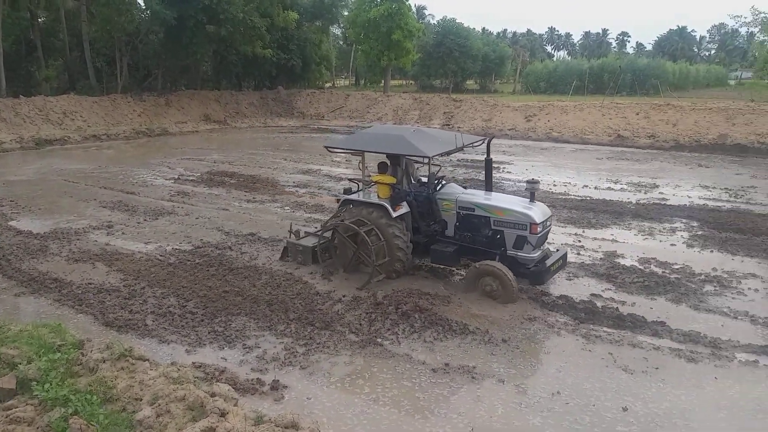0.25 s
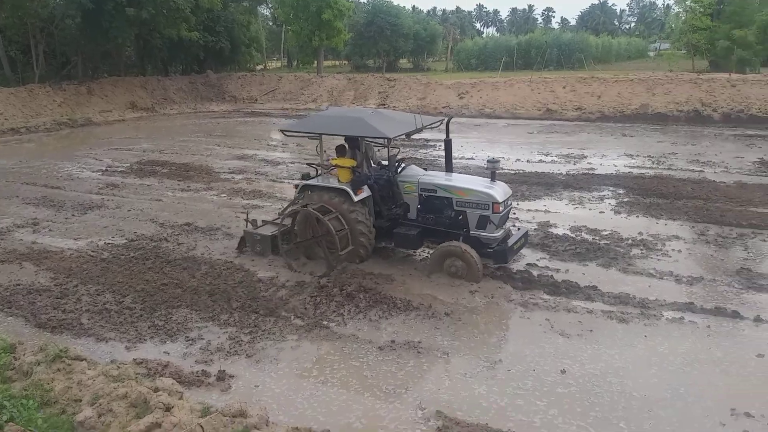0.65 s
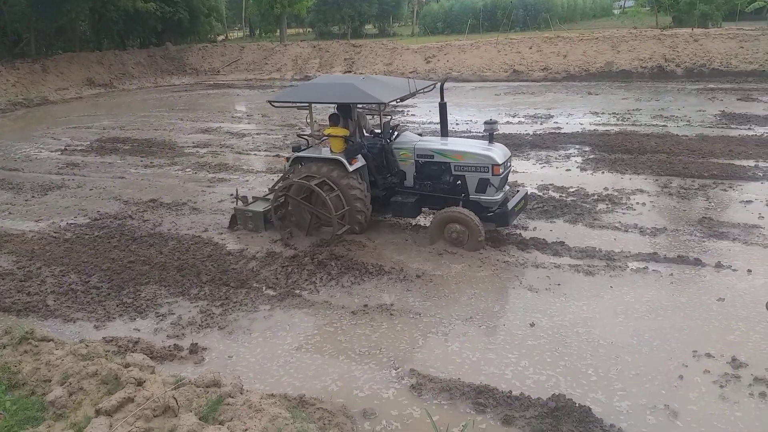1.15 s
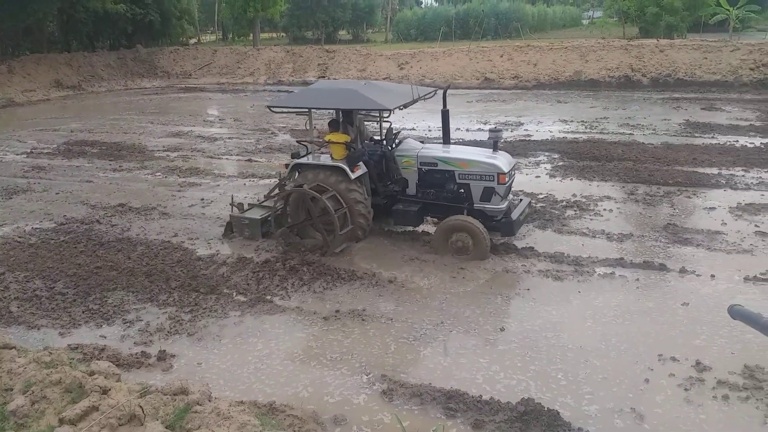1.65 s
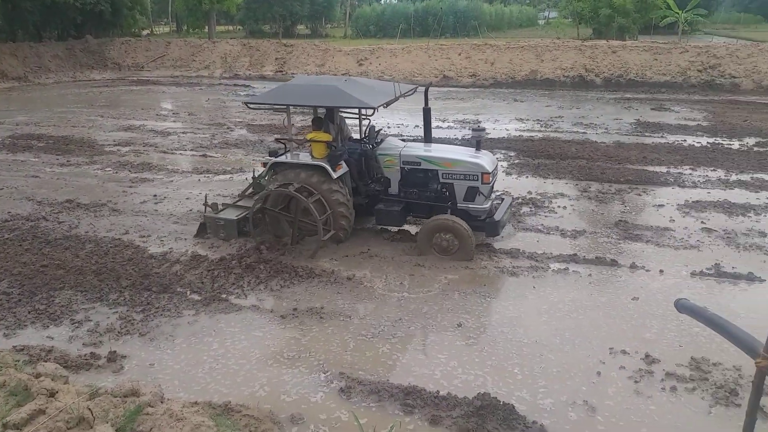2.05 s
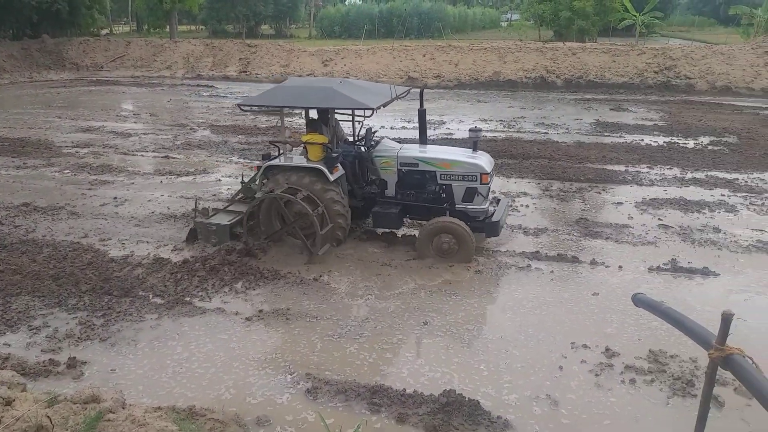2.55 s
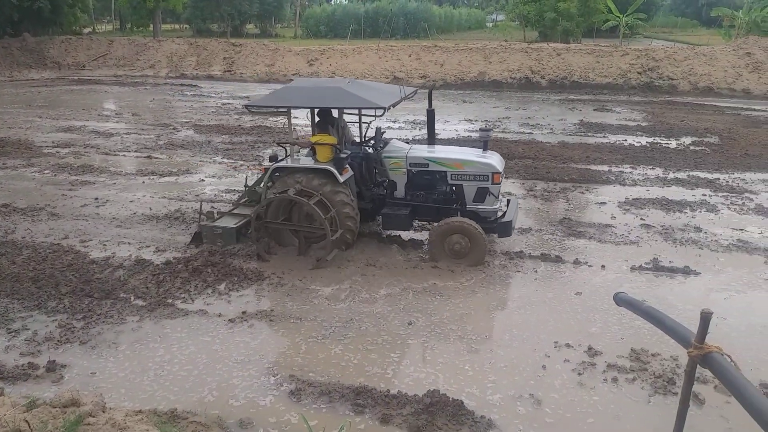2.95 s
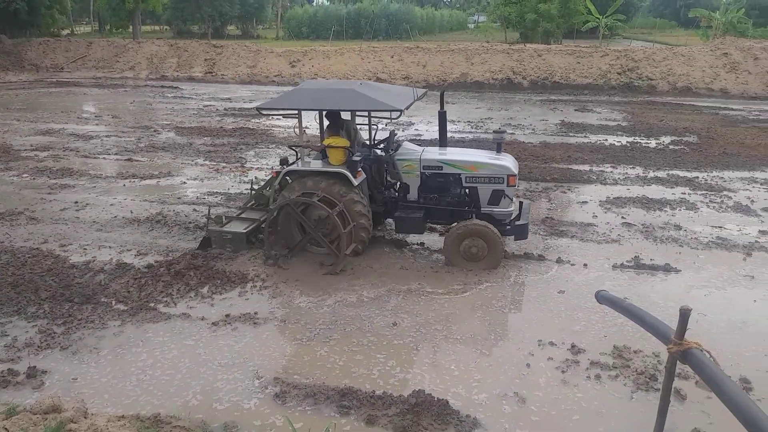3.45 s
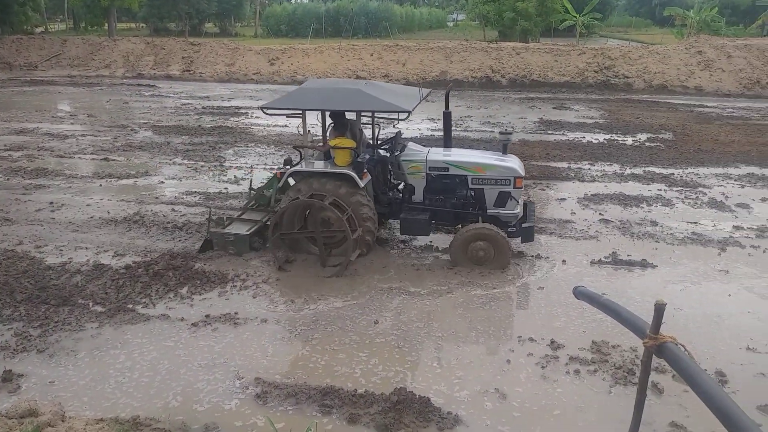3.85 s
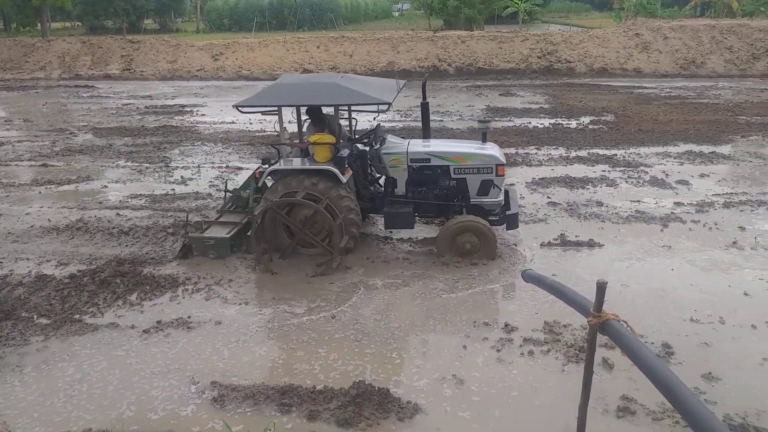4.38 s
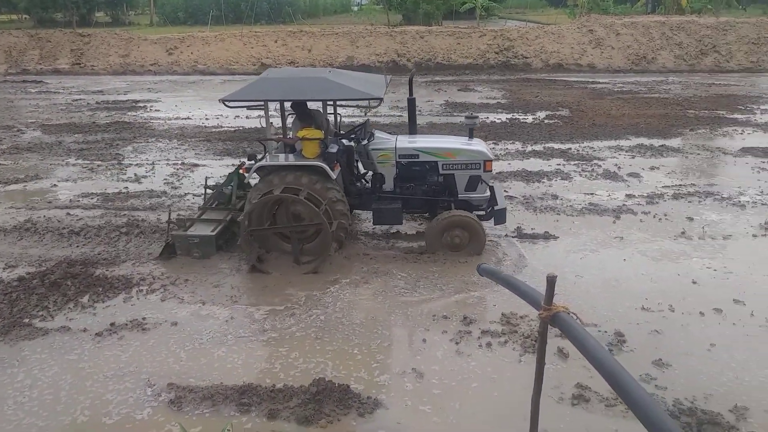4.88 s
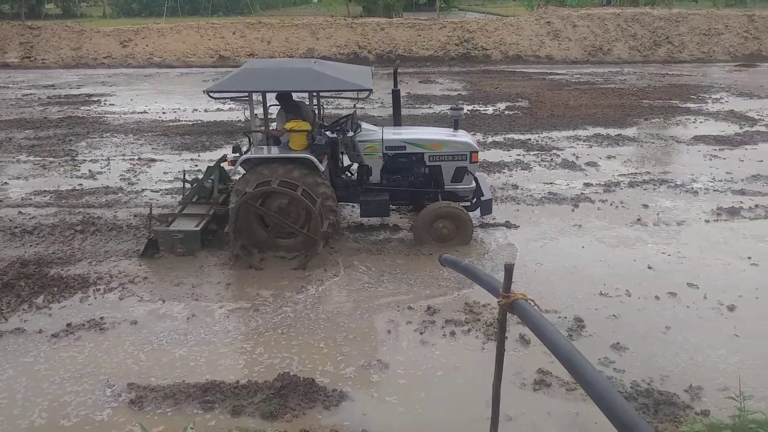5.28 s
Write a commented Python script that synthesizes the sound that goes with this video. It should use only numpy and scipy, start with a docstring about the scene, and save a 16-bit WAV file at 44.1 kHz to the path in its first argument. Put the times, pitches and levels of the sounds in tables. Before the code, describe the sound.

A diesel tractor runs steadily some metres away in an open, flooded field, with a rapid exhaust chug, hard metallic knocking and rattling panels. The engine labours slightly three times as its tiller meets heavier mud. Gears whine faintly, and a fine hiss of sprayed muddy water slowly fades. A bird chirps twice, briefly, right at the start.

```python
"""A flooded field: some metres away, a three-cylinder diesel tractor drags a tiller past.
Each firing sends a thud and a rasp up the exhaust stack, knocks the block and shakes the metalwork.
Heavier mud loads the engine three times; early on, the tractor turns from front-on to side-on.
Gears whine faintly, the tiller sprays muddy water, and a bird chirps twice."""
import sys
import numpy as np
from scipy import signal
from scipy.fft import rfft, irfft
from scipy.io import wavfile

SR = 44100
rng = np.random.default_rng(int(sys.argv[2]) if len(sys.argv) > 2 else 0)


def generate_wav(sig):
    """Save sig (samples, or channels by samples) to the path in sys.argv[1] as 16-bit PCM at SR."""
    pcm = np.round(np.clip(np.atleast_2d(sig).T, -1, 1) * 32767).astype(np.int16)
    wavfile.write(sys.argv[1], SR, pcm)


N = 243458
TIME = np.arange(N) / SR
FROM_MID_S = TIME - TIME.mean()


# governor hunting: (time [s], firing rate [Hz])
FIRING_RATE = [(0, 40.53), (.49, 40.14), (.75, 40.38), (.99, 39.42), (1.21, 39.12), (1.71, 39.99),
               (2.25, 39.3), (2.56, 39.42), (3.06, 38.59), (3.46, 38.88), (3.76, 39.92), (3.99, 39.79),
               (4.27, 39.05), (4.68, 39.06), (5.06, 39.6), (5.52, 39.64)]

def firing_count():
    """Engine phase: each whole number is one firing."""
    return np.cumsum(curves(FIRING_RATE)[0]) / SR + .18


# firing order, one row per cylinder: (knock [dB], exhaust pulse [dB])
CYLINDERS = [(3, 6.5), (4, 9.5), (-0.5, 8)]
KNOCK_DB, PULSE_DB = np.transpose(CYLINDERS)
# (multiple of firing rate, mid level [dB], slope with thud level [dB/dB], trend [dB/s])
EXHAUST_PARTIALS = [(1, -58.5, 1, -0.5), (2, -40.5, 0.3, .5), (3, -57.5, -2, -2), (4, -44.5, 0.5, 1.5),
                    (5, -45.5, 4, 1), (6, -56, 6, -1.5), (7, -47, 2.5, -0.5), (8, -48.5, -1, 0),
                    (10, -51.5, 0, -1)]
# stack spectra: (frequency [Hz], relative level [dB])
THUD_SPECTRUM = [(56, -56), (95, -11), (108, -6), (194, -2), (394, -4), (443, -9), (480, -6), (620, -27),
                 (1060, -120)]
RASP_SPECTRUM = [(2500, -42), (3500, 2), (4250, -18), (5350, 0.5), (6200, -5.5), (6850, -1.5), (7450, 6),
                 (8300, 10), (9100, 2), (10300, -5.5), (12000, -11.5), (14000, -4.5), (16000, -16)]
# (mid level [dB], load slope [dB/dB], trend [dB/s], front-on offset [dB])
THUD_LAW = (-35.9, 0.32, -0.11, -1.5)
RASP_LAW = (-32, 1.5, 0.14, -0.5)

def exhaust(firings, smear_cycles=0.0358, waver_db=0.4):
    """The stack: a low note, a thud of gas at each firing, and a rasp that grows with load."""
    thud_db = follow(THUD_LAW)
    push_db = thud_db - thud_db.mean()
    note = 0
    for k, db, per_thud, trend in EXHAUST_PARTIALS:
        # the silencer delays the higher partials, rounding each pulse
        cycles = k * (firings - 1 / 4) - smear_cycles * (k - 2) ** 2
        level_db = db + per_thud * push_db + trend * FROM_MID_S
        note += gain_of(level_db) * np.sqrt(2) * np.cos(2 * np.pi * cycles)
    puff = bursts(firings, PULSE_DB, delay_s=0.0017, rise_s=0.0013, decay_s=0.0024, uneven_db=5)
    thud = gain_of(thud_db) * colour(rng.standard_normal(N) * (puff + 5.3), THUD_SPECTRUM)
    jet = bursts(firings, PULSE_DB, delay_s=.0005, rise_s=.007, decay_s=.0075, uneven_db=.6)
    rasp_db = follow(RASP_LAW) + waver_db * drift(12)
    rasp = gain_of(rasp_db) * colour(rng.standard_normal(N) * jet, RASP_SPECTRUM)
    return note + thud + rasp


# block and cover modes: (frequency [Hz], width [Hz], relative level [dB])
BLOCK_MODES = [(1770, 36, -20), (1848, 43, -3.5), (1918, 9, 1), (1973, 7.6, -2), (2027, 97, 1.5),
               (2127, 14, -1.5), (2141, 27, -1), (2310, 18, -6.5), (2257, 22, -7.5), (2317, 83, -32)]
# combustion blow: (frequency [Hz], relative level [dB])
BLOW_SPECTRUM = [(1100, -18), (1500, -19), (1750, -3.5), (2400, -7), (2750, -9), (3100, -13.5), (4200, -19)]
# (mid level [dB], load slope [dB/dB], trend [dB/s], front-on offset [dB])
BLOCK_LAW = (-18, 0.36, -0.39, 0)
# ring pitch: (mid pitch [Hz], load slope [Hz/dB], trend [Hz/s], front-on offset [Hz])
RING_LAW = (2024, 13, 21, 75)

def block(firings, reach_hz=160):
    """Combustion and piston slap ring the block; load favours its higher modes."""
    blow = bursts(firings, KNOCK_DB, delay_s=0, rise_s=.002, decay_s=.011, uneven_db=.6)
    drive = colour(grains(per_s=12000, spread_db=.3) * (blow + .85), BLOW_SPECTRUM)
    ring_hz = follow(RING_LAW)
    centre_hz = ring_hz.mean()
    tilt_per_hz = (ring_hz - centre_hz) / reach_hz ** 2
    ring = sum(gain_of(db) * np.exp(tilt_per_hz * (hz - centre_hz)) * resonate(drive, hz, width_hz)
               for hz, width_hz, db in BLOCK_MODES)
    return gain_of(follow(BLOCK_LAW)) * evened(ring)


# hardest diesel knocks: (time [s], level [dB], ring [Hz])
HARD_KNOCKS = [(.9221, -4.2, 1970), (1.1511, -2.5, 2050), (1.3792, -2.2, 1950), (1.733, -1.5, 2080),
               (1.7615, -3, 2070), (1.8085, -1.5, 2080), (1.884, -1, 2060), (1.9107, -3.5, 2050),
               (1.9568, -4.5, 2040), (2.362, -2.8, 2090), (2.9787, -2.8, 2170), (3.2321, -3, 2080),
               (3.2839, -2, 2060), (3.3632, -2.3, 2100), (3.4405, -4, 2170), (3.643, -5, 2230),
               (4.3543, -5, 2110), (4.4307, -3.2, 2120), (4.5804, -3.8, 2210), (4.8883, -4.3, 2010),
               (5.0903, -5, 2120), (5.1916, -3.8, 1930), (5.2421, -4, 2090)]

def knocks(rows, rise_s=0.001, decay_s=0.0049, slap_delay_s=.012, slap_db=-10.5):
    """Each knock rings the block; the piston slaps once more just after."""
    age_s = TIME[:SR // 20]
    envelope = strike(age_s, rise_s, decay_s)
    out = np.zeros(N + SR)
    for knock_s, db, hz in rows:
        knock_phase, slap_phase, late = rng.random(3)
        slap_s = knock_s + slap_delay_s * (late + .5)
        for start_s, hit_db, phase in ((knock_s, db, knock_phase), (slap_s, db + slap_db, slap_phase)):
            at = round(start_s * SR)
            ring = np.sin(2 * np.pi * (hz * age_s + phase))
            out[at:at + len(age_s)] += gain_of(hit_db) * envelope * ring
    return out[:N]


# (mid level [dB], load slope [dB/dB], trend [dB/s], front-on offset [dB])
LIGHT_KNOCK_LAW = (-18.5, 1.2, 1.3, -2)

def light_knocks(firings, lag_s=.004, jitter_s=.005, uneven_db=3.5, scatter_hz=55):
    """Firings without a hard knock still knock a little, by cylinder, load and chance."""
    at = np.flatnonzero(np.diff(np.floor(firings))) + 1
    number = firings[at].astype(int)
    late, harsh, detune = rng.random((len(at), 3)).T
    start_s = TIME[at] + lag_s + jitter_s * late
    cylinder_db = np.take(KNOCK_DB, number, mode="wrap")
    level_db = follow(LIGHT_KNOCK_LAW)[at] + cylinder_db + uneven_db * evened(harsh - .5)
    ring_hz = follow(RING_LAW)[at] + scatter_hz * (2 * detune - 1)
    rows = np.transpose([start_s, level_db, ring_hz])
    hard = np.interp(np.transpose(HARD_KNOCKS)[0], TIME, firings).astype(int)
    return knocks(rows[~np.isin(number, hard)])


# rattle spectra: (frequency [Hz], relative level [dB])
CHASSIS_SPECTRUM = [(260, -48.5), (440, -14.5), (538, -1.5), (612, -2), (766, 3.5), (864, -2), (1150, -1.5),
                    (1500, -39), (2530, -120)]
PANEL_SPECTRUM = [(900, -17.5), (1130, -28), (1210, 2), (1300, 3.5), (1370, 3), (1440, 4), (1500, 2.5),
                  (1570, -2), (1640, 1), (1720, 1.5), (2240, -4.5), (3800, -73.5)]
VALVE_SPECTRUM = [(1500, -14), (2550, -6), (2980, -11), (3370, -4), (3630, -2.5), (3860, -7), (4300, -22.5),
                  (5590, -20.5), (9460, -120)]
# (mid level [dB], load slope [dB/dB], trend [dB/s], front-on offset [dB])
CHASSIS_LAW = (-28, 0.47, -0.05, 1)
PANEL_LAW = (-23, 0.3, -0.37, 3)
VALVE_LAW = (-26, 0.37, -0.23, 1)
# thin steel parts: (frequency [Hz], width [Hz], side-on level [dB])
STEEL_MODES = [(1449, 30, -47), (1582, 26, -31.5), (2817, 13, -47.5), (3157, 43, -45), (3436, 24, -41),
               (5345, 46, -46)]

def clatter(firings, steel_front_db=2):
    """Chassis, panels and valve gear chatter and thin steel sings, harder after each firing."""
    shake = bursts(firings, [0], delay_s=0.0015, rise_s=0.0076, decay_s=0.0072, uneven_db=3.5)

    def rattle(spectrum, per_s, spread_db, floor):
        return colour(grains(per_s, spread_db) * (shake + floor), spectrum)

    chassis = gain_of(follow(CHASSIS_LAW)) * rattle(CHASSIS_SPECTRUM, per_s=7000, spread_db=2, floor=3.3)
    panels = gain_of(follow(PANEL_LAW)) * rattle(PANEL_SPECTRUM, per_s=8000, spread_db=2.5, floor=2)
    valves = gain_of(follow(VALVE_LAW)) * rattle(VALVE_SPECTRUM, per_s=9000, spread_db=0.6, floor=5)
    taps = rattle([(1200, 0), (8000, 0)], per_s=4000, spread_db=4, floor=1)
    steel = sum(gain_of(db) * evened(resonate(taps, hz, width_hz)) for hz, width_hz, db in STEEL_MODES)
    return chassis + panels + valves + steel * gain_of(steel_front_db * front_view())


# gear meshes: (teeth per crank turn before rounding, mid level [dB], trend [dB/s])
GEAR_MESHES = [(20.5, -50, -2.8), (21, -45.5, -1.3), (25, -44, .6), (30, -40, 0.1), (39.7, -42, -1)]

def gears(firings, waver_db=3, slack_cycles=0.071):
    """Meshing teeth whine, wavering in level and phase."""
    crank_turns = firings * 2 / 3  # four-stroke: three firings in two turns
    whine = 0
    for teeth, db, trend in GEAR_MESHES:
        order = round(2 * teeth) / 2
        waver = gain_of(waver_db * drift(3))
        tone = np.sin(2 * np.pi * (order * crank_turns + slack_cycles * drift(6)))
        whine += gain_of(db + trend * FROM_MID_S) * evened(waver * tone)
    return whine


# water spray: (frequency [Hz], relative level [dB])
SPRAY_SPECTRUM = [(3600, -17.5), (4250, -14), (4750, -4.5), (5400, -2.5), (5950, -8.5), (6750, -8),
                  (7400, 1), (8250, 2), (9100, -5), (10300, -12.5), (12000, -17), (14000, -15),
                  (16000, -10.5)]

def tiller():
    """Blades fling a fine spray of muddy water; the hiss slowly fades."""
    level_db = -28 + 0.13 * drift(3.1) - 0.47 * TIME
    return gain_of(level_db) * colour(grains(per_s=20000, spread_db=2), SPRAY_SPECTRUM)


# bird: (time [s], length [s], start pitch [Hz], end pitch [Hz], level [dB])
BIRD_CHIRPS = [(.109, .028, 3950, 3150, -22.5), (.478, .069, 4500, 2950, -26.5)]

def chirp(start_s, length_s, start_hz, end_hz, db, flutter_db=1.5):
    """A thin whistle that falls ever faster, peaks late and flutters on its way across the field."""
    progress = np.clip((TIME - start_s) / length_s, 0, 1)
    hz = start_hz + (end_hz - start_hz) * progress ** 2
    swell = np.sqrt(2) * np.sin(np.pi * progress ** 2) * gain_of(db + flutter_db * drift(120))
    return swell * np.sin(2 * np.pi * np.cumsum(hz) / SR)


# open air: (frequency [Hz], relative level [dB])
AIR_SPECTRUM = [(15, -22), (30, -14), (55, -4), (90, 0), (200, 0), (600, -22)]

def field_air():
    """Low rush of the open field."""
    return gain_of(-60) * colour(rng.standard_normal(N), AIR_SPECTRUM)


# the tiller bites into heavier mud: (time [s], engine load re usual [dB])
ENGINE_LOAD = [(0, -4), (.8, -1.0), (1.0, -1), (1.25, 2.5), (1.65, 0.4), (2.0, -2), (2.7, 1.7), (2.95, 3.5),
               (3.58, 2), (3.85, -4), (4.08, -1.5), (4.35, 1.5), (4.8, 1.4), (5.1, -1.5), (5.52, -2.5)]

def follow(law):
    """A level or pitch that tracks the load and shifts as the tractor passes and turns."""
    mid, per_load, per_s, front_offset = law
    load_db = curves(ENGINE_LOAD)[0]
    return mid + per_load * load_db + per_s * FROM_MID_S + front_offset * front_view()


def front_view(turn_s=.8, ease_s=0.14):
    """1 with the tractor front-on, 0 side-on."""
    return (1 - np.tanh((TIME - turn_s) / (2 * ease_s))) / 2


def strike(age_s, rise_s, decay_s):
    """Impact envelope: smooth rise, exponential decay."""
    return (1 - np.exp(-(age_s / rise_s) ** 2)) * np.exp(-age_s / decay_s)


def bursts(firings, cylinder_db, delay_s, rise_s, decay_s, uneven_db):
    """Envelope with one uneven pulse per firing; rms 1."""
    at = np.flatnonzero(np.diff(np.floor(firings)))
    level_db = np.take(cylinder_db, firings[at + 1].astype(int), mode="wrap")
    kicks = np.zeros(N)
    kicks[at] = gain_of(level_db + uneven_db * np.clip(rng.standard_normal(len(at)), -2, 2))
    age_s = np.maximum(TIME[:SR // 10] - delay_s, 0)
    return evened(signal.oaconvolve(kicks, strike(age_s, rise_s, decay_s))[:N])


def grains(per_s, spread_db):
    """Random train of tiny, uneven impacts; rms 1."""
    size = gain_of(spread_db * np.minimum(rng.exponential(1, N), 4))
    return evened(rng.standard_normal(N) * size * (rng.random(N) < per_s / SR))


def colour(x, spectrum, size=4096):
    """Minimum-phase filter with the given spectrum, rolled off below its first point; output rms 1."""
    hz = np.fft.rfftfreq(size, 1 / SR)
    point_hz, point_db = np.transpose(spectrum)
    db = np.interp(np.log(hz + 1), np.log(point_hz + 1), point_db)
    gain = gain_of(db) * np.minimum(hz / point_hz[0], 1) ** 2
    cepstrum = irfft(np.log(np.maximum(gain, 1e-5)))
    cepstrum[1:size // 2] *= 2
    cepstrum[size // 2 + 1:] = 0
    impulse = irfft(np.exp(rfft(cepstrum)))
    return evened(signal.oaconvolve(x, impulse)[:N])


def resonate(x, hz, width_hz):
    """One mode, peak gain 1."""
    return signal.lfilter(*signal.iirpeak(hz, hz / width_hz, SR), x)


def drift(rate_hz):
    """Low-passed random wander; rms 1."""
    hz = np.fft.rfftfreq(N, 1 / SR)
    return evened(irfft(rfft(rng.standard_normal(N)) * np.exp(-(hz / rate_hz) ** 2), N))


def curves(rows):
    """Table columns, linearly interpolated in time."""
    time_s, *columns = np.transpose(rows)
    return [np.interp(TIME, time_s, column) for column in columns]


def gain_of(db):
    """Decibels to amplitude."""
    return 10 ** (np.asarray(db) / 20)


def evened(x):
    """Scales to rms 1."""
    return x / np.sqrt(np.mean(x ** 2) + 1e-20)


# port mismatch: (frequency [Hz], left minus right [dB], left phase lead [rad])
PORT_MISMATCH = [(1100, 0, 0), (1600, 1.4, .2), (1880, 3.8, 0), (2150, 1.8, -.23), (2550, .2, -.13),
                 (2750, 0, 0), (8600, 0, 0), (9400, -1.1, -.2), (9820, -3.8, -.03), (10100, -2, .15),
                 (10400, 0, 0)]

def microphones(x):
    """Two close ports hear the same sound, except near their slightly unequal resonances."""
    hz, balance_db, lead_rad = np.transpose(PORT_MISMATCH)
    log_ratio = np.log(gain_of(balance_db)) + 1j * lead_rad
    half = np.interp(np.fft.rfftfreq(N, 1 / SR), hz, log_ratio) / 2
    return irfft(rfft(x) * np.exp([half, -half]), N)


def scene():
    """Engine, clatter and gears share one crankshaft; spray, air and bird join them, in stereo."""
    firings = firing_count()
    engine = exhaust(firings) + block(firings) + light_knocks(firings) + knocks(HARD_KNOCKS)
    machinery = clatter(firings) + gears(firings) + tiller()
    background = field_air() + sum(chirp(*row) for row in BIRD_CHIRPS)
    return microphones(engine + machinery + background)


def record(dry, low_cut_hz=32, high_cut_hz=15800):
    """Soft clip at full scale, low cut, band limit."""
    clipped = dry / (1 + dry ** 8) ** (1 / 8)
    highpass = signal.butter(4, low_cut_hz, "highpass", fs=SR, output="sos")
    lowpass = signal.firwin(511, high_cut_hz, window=("kaiser", 9), fs=SR)
    return signal.oaconvolve(signal.sosfilt(highpass, clipped), lowpass[None], "same")


dry = scene()
out = record(dry)
generate_wav(out)
```